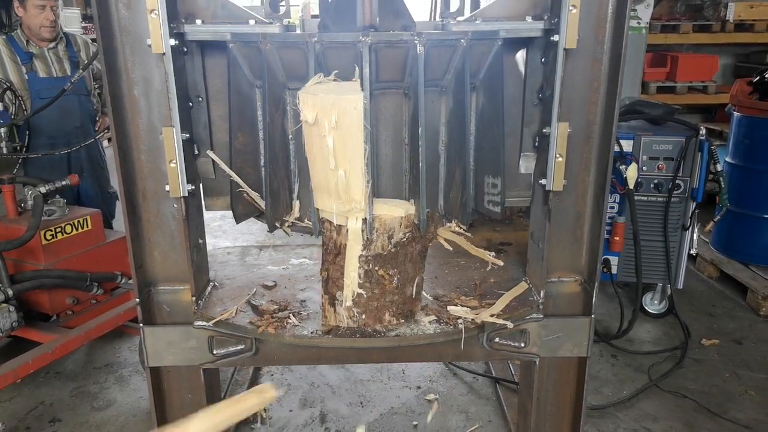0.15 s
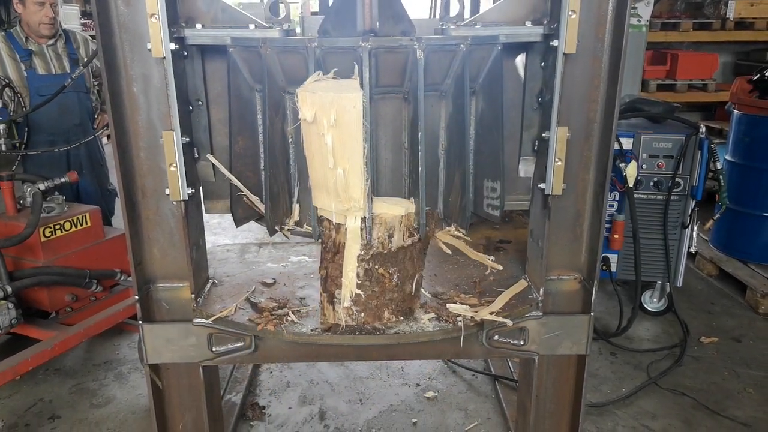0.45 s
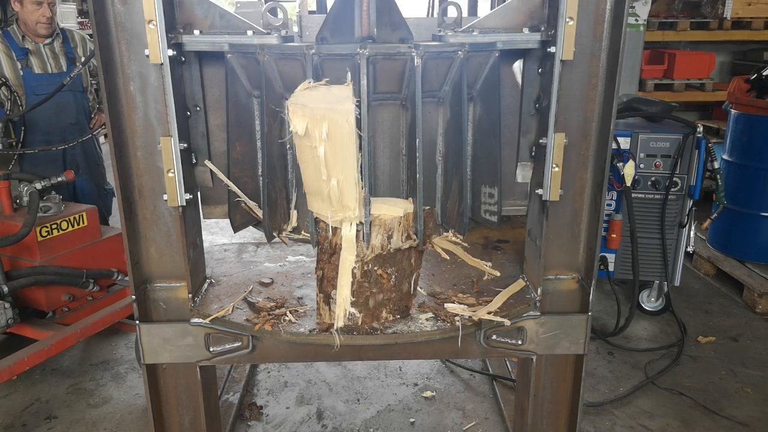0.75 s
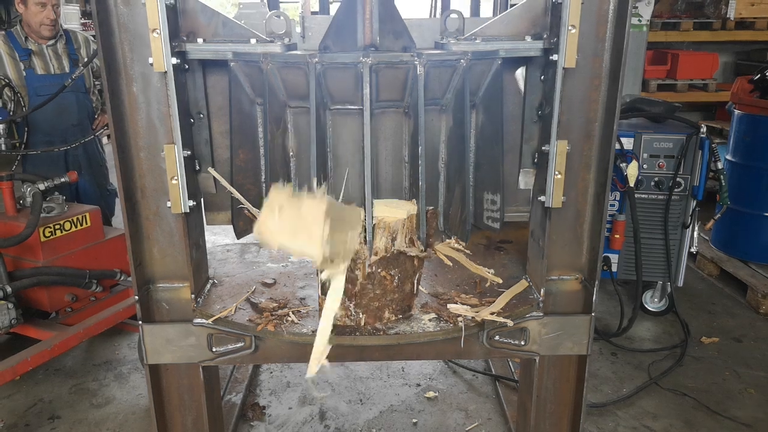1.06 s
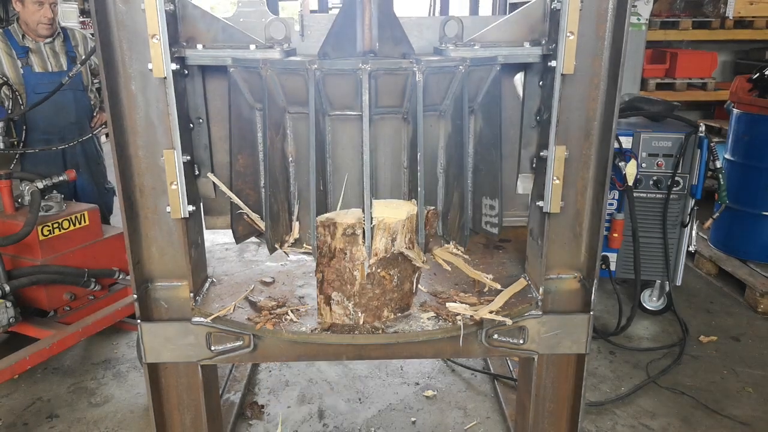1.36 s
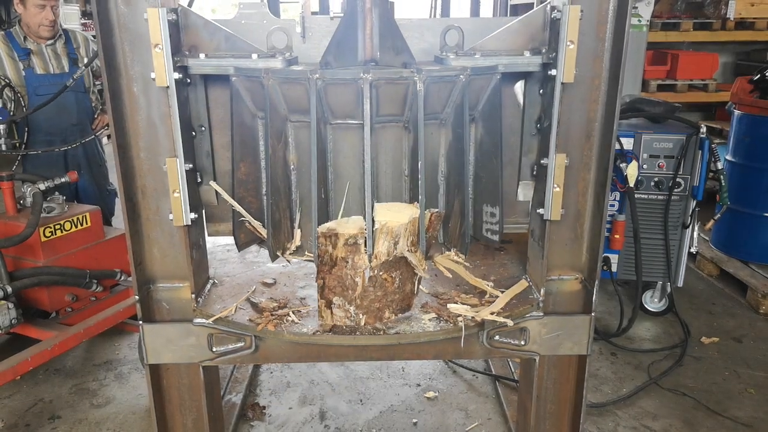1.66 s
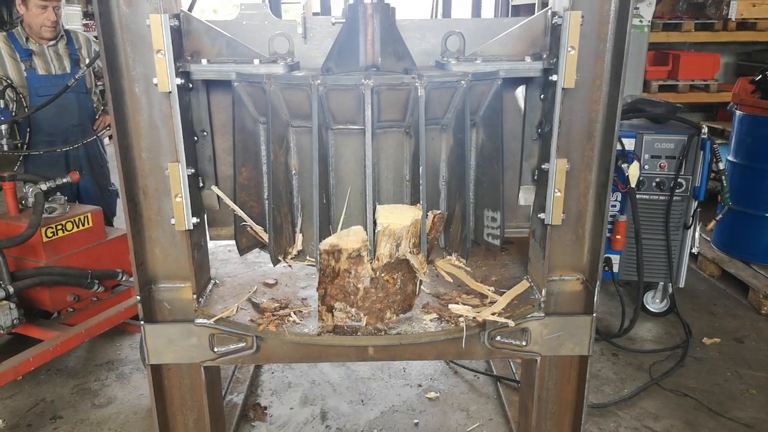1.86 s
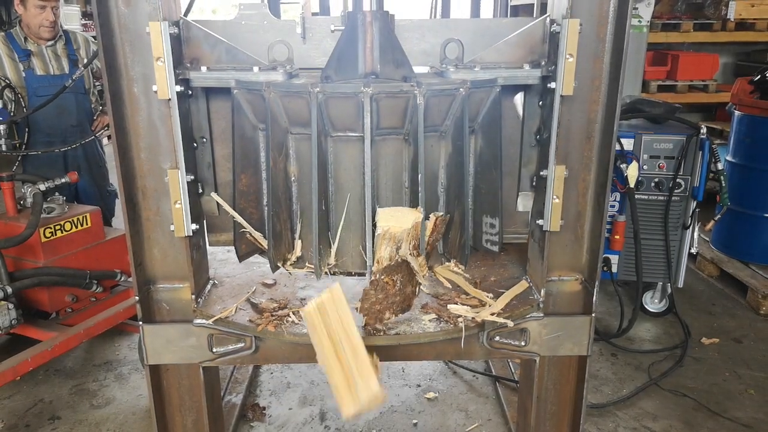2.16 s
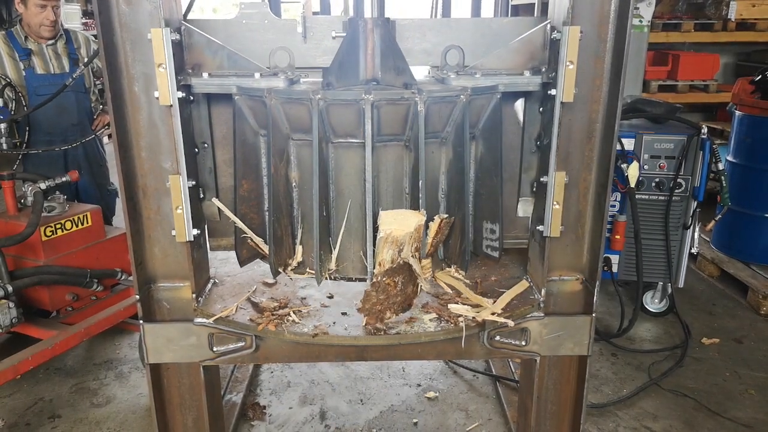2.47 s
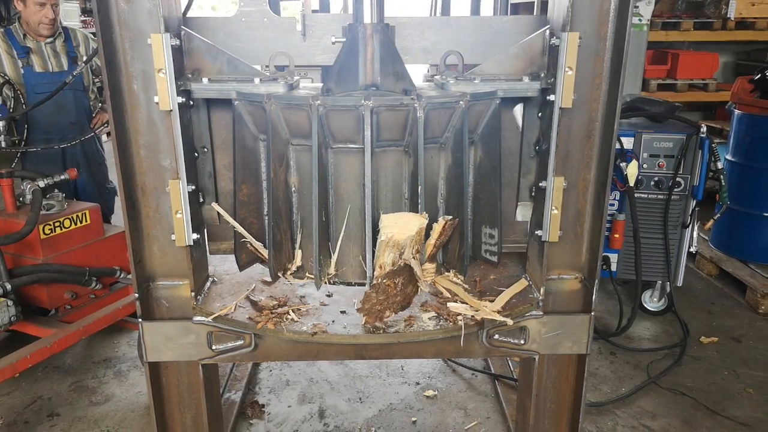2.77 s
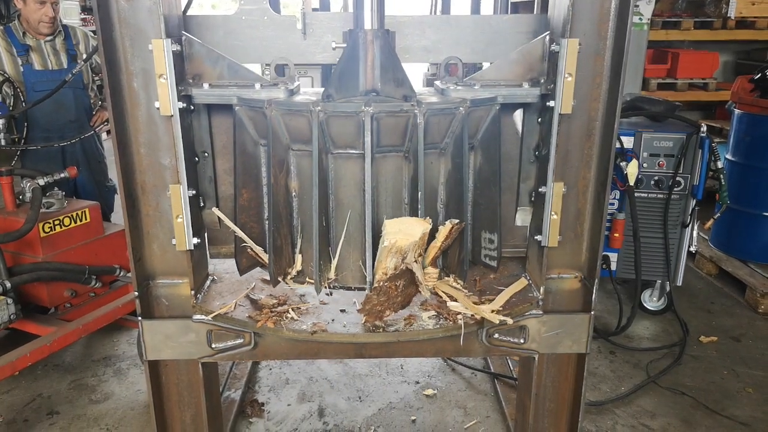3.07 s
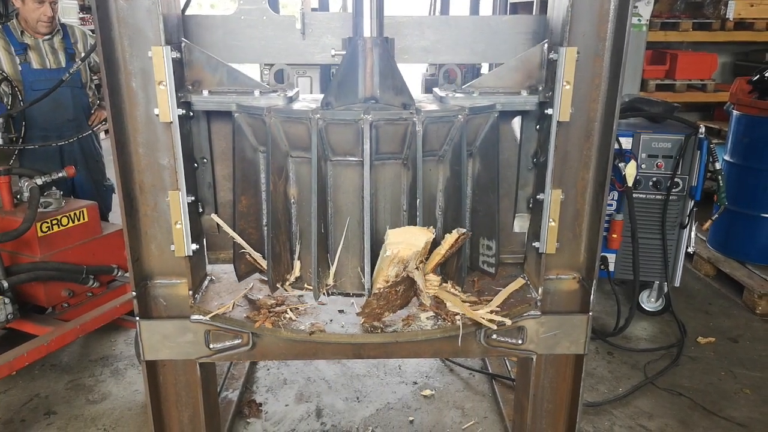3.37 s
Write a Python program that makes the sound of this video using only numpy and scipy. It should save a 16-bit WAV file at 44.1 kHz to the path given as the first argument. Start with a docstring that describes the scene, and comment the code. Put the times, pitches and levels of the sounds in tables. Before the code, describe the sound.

Hydraulic log splitter pressing a log apart, pump whining, fibres tearing, split pieces knocking and dropping

```python
"""A piston pump whines over a motor hum, and at once the frame bumps and fibres crack: a hydraulic
log splitter presses a log through its steel knives, heard in stereo with the workshop around it.
The power unit is summed tones and filtered noise. Wood clacks on the knives, a billet clangs on the
steel frame and split pieces drop to the floor: each blow is a short noise burst, filtered or with
decaying resonances. A diffuse noise tail gives the room."""
import sys
import numpy as np
from scipy import signal
from scipy.fft import rfft, irfft
from scipy.io import wavfile

SR = 44100
rng = np.random.default_rng(int(sys.argv[2]) if len(sys.argv) > 2 else 0)


def dump(signal):
    """Clip the signal to [-1, 1] and save it as 16-bit WAV at the path in sys.argv[1]."""
    limited = np.clip(np.atleast_2d(signal).T, -1, 1)
    pcm = np.round(limited * 32767).astype(np.int16)
    wavfile.write(sys.argv[1], SR, pcm)


N = 156114
T = np.arange(N) / SR

# In every table, left-right dB is the left side's level over the right's.
# How alike the two sides are. Each row: frequency in Hz, likeness from 0 to 1.
LIKENESS = [(50, 1), (130, 0.97), (260, 0.96), (500, 0), (1000, 0.95), (2000, 0), (12000, 0)]
PAN_ABOVE_HZ = 240

# Workshop decay. Each row: frequency in Hz, time to fall 60 dB in seconds.
ROOM_T60 = [(80, 0.84), (250, 1), (700, 1), (2000, 0.98), (4500, 0.21), (12000, 0.17)]
ROOM_BUILD_S = .006
# Room sends against the direct sound.
CLACK_WET_DB, CRACK_WET_DB, DROP_WET_DB, BUMP_WET_DB, CLANG_WET_DB = -4.5, -4, -4, -0.5, 5.5

# Pump harmonics. Each row: multiple of the piston rate, level in dB, left-right in dB.
PUMP_HARMONICS = [(1, -40.5, -0.5), (2, -62, -27), (3, -49, 25), (4, -38.5, -12), (5, -50, -13),
                  (6, -43.5, -3), (7, -67, 32), (8, -44.5, -1.5), (9, -34, -3.5), (10, -40, -58),
                  (11, -49.5, -7.5)]
PUMP_HZ, PISTONS, PUMP_WANDER = 271.05, 9, .0003  # piston rate; wander as a share of it
PUMP_FLUTTER_DB, PUMP_SPREAD_RAD = 0.8, 1.0
PULSE_SCATTER_RAD = 1.08  # how far the harmonics stray from one sharp piston pulse
WHINE_DB, WHINE_DB_PER_OCT, WHINE_SCATTER_DB = -58.5, -5, 3  # harmonics above the table
# Motor and other steady tones. Each row: frequency in Hz, level in dB, left-right in dB.
HUM_TONES = [(49.7, -38.5, 0), (790, -51, -6), (2538, -49.5, -8), (8402, -63, 12)]
# Colour of the shaft orders. Each row: frequency in Hz, relative level in dB.
SHAFT_COLOUR = [(100, -57), (300, -11), (600, 1), (900, -7), (2000, 2), (2600, 10), (3200, 17), (7000, -14),
                (14000, -15)]
SHAFT_DB = -21  # against the flow noise
# Colour of oil flow, fan and casing before the rumble cut. Each row: frequency in Hz, relative dB per Hz.
FLOW_COLOUR = [(25, 19), (45, 9.5), (80, 3.5), (135, 1.5), (200, -4.5), (300, -3.5), (480, -17), (680, -18),
               (900, -10), (1300, -13), (2000, -7.5), (2650, -3.5), (3150, -16), (5500, -17.5), (7300, -19),
               (8700, -25.5), (10300, -24), (12000, -30.5), (15000, -40)]
FLOW_DB, FLOW_PAN_DB, RUMBLE_CUT_HZ = -36.5, -1, 70
# Thin hiss of the valve. Each row: time in seconds, level in dB.
VALVE_LEVEL = [(0, -57), (.28, -47.5), (.4, -102), (2.4, -66), (2.8, -59), (3.54, -53.5)]
VALVE_HZ, VALVE_WIDTH_HZ = 10060, 580

# Floor and frame rumble. Each row: start in seconds, starting level in dB.
RUMBLES = [(0, -35), (1.445, -27.5), (2.475, -32.5)]
# Colour of that rumble. Each row: frequency in Hz, relative level in dB.
RUMBLE_COLOUR = [(30, -20.5), (90, 5.5), (170, -4.5), (300, -7), (600, -12), (2000, -40.5)]
RUMBLE_T60_S = 1.5

# Modes of the steel frame. Each row: frequency in Hz, level in dB before the trim, 60 dB decay in seconds.
FRAME_MODES = [(339, -29, 1), (700, -37, 1), (754, -38, 1.2), (940, -36, 1.1), (1233, -28, 1.5),
               (1396, -30, 1.3), (1470, -28.5, 1.2), (1678, -31, 1.3), (1805, -32, .9), (1880, -32, 1.1),
               (1965, -28.5, 1.2), (2068, -29, 1.2), (2250, -36, 1.1), (2363, -31, .5)]
FRAME_TRIM_DB, FRAME_PAN_DB = -0.5, -5

HIT_S = .01  # a blow of 0 dB has the energy of a sound of rms 1 this long
CONTACT_RISE_S = 0.00011
RING_RISE_S, RING_SPREAD_RAD = .0012, 0.51  # the spread is reached at 1 kHz, less below

# The frame bumps as the log gives. Each row: start in seconds, level in dB, pitch in Hz.
BUMPS = [(.004, -23, 101), (0.038, -27.5, 124), (0.08, -20.5, 86), (0.114, -32, 110), (0.151, -22, 107),
         (0.18, -22.5, 83), (0.305, -35, 65), (1.444, -17, 68.4), (1.523, -28, 107)]
# Colour of a bump's rumble. Each row: frequency in Hz, relative level in dB.
BUMP_COLOUR = [(25, 4), (55, -5.5), (85, 0), (160, 3), (240, -9), (400, -13), (900, -9.5), (3000, -75),
               (12000, -76)]
BUMP_S, BUMP_RUMBLE_DB = 0.0077, -3.5  # decay constant; rumble against the swing

# Pieces land. Each row: start in seconds, level in dB, left-right in dB, contact decay in seconds,
# thud in dB against the contact, thud in Hz, ring in dB against the contact, ring in Hz.
DROPS = [(0.402, -13.5, -9, 0.0023, 4.5, 423, 5.5, 2077), (1.4404, -15.5, -5, 0.0022, 1.5, 460, 0.5, 1313),
         (1.4444, -17, -8, 0.0037, 0.5, 440, -1, 1373), (2.4756, -19, -6.5, 0.0095, -1.5, 302, -6, 1390)]
# Colour of the landing contact. Each row: frequency in Hz, relative level in dB.
DROP_COLOUR = [(30, -1), (80, 8), (200, 2.5), (350, 5.5), (550, 3.5), (720, -4), (950, 5), (1350, -1),
               (1700, 9), (2300, 4.5), (3100, -15.5), (5500, -10), (9000, -26), (12000, -16.5),
               (15000, -44)]
THUD_SHARE, KNOCK_RING_S = 0.53, 0.003  # thud decay against the contact's; decay of the upper ring

# Wood strikes the frame. Each row: start in seconds, level in dB, left-right in dB, decay in seconds.
CLANGS = [(0.3287, -14, -3, 0.0095), (0.3392, -23.5, -2, 0.0033), (0.344, -23.5, 7, 0.0063)]
# Colour of a clang. Each row: frequency in Hz, relative level in dB.
CLANG_COLOUR = [(60, -25), (220, 0.5), (330, -3), (500, -9), (750, 7.5), (1050, -0.5), (1420, 10.5),
                (1700, -1), (2050, 8.5), (2650, 3.5), (3200, -11), (5500, -18), (12000, -28)]

# Fine crackle of tearing fibres. Each row: time in seconds, level in dB.
TEARING_LEVEL = [(0, -32), (.28, -28.5), (.42, -22), (.75, -28), (.9, -36.5), (1.5, -48), (1.72, -40),
                 (1.95, -43.5), (2.15, -47), (2.4, -47), (3.54, -56)]
# Colour of the crackle. Each row: frequency in Hz, relative level in dB.
FIBRE_COLOUR = [(100, -17.5), (350, 5), (550, 0), (900, 0.5), (1500, 6), (2400, 2), (3200, -8),
                (5500, -15.5), (8000, -24.5), (15000, -47)]
FIBRE_S, FIBRES_PER_S = 0.0026, 290  # decay of one snap; rate before clumping
FIBRE_SPREAD_DB, FIBRE_CLUMP_DB, CLUMP_HZ = 2.5, 3, 14

# Larger fibres snap. Each row: start in seconds, level in dB, left-right in dB, decay in seconds.
CRACKS = [(0.032, -23.5, -2, 0.014), (0.342, -29, -1, 0.0044), (0.475, -30, -2, 0.0039),
          (.56, -28.5, 0, 0.012), (1.4364, -28, -21, 0.0027), (1.5176, -19, -3.5, 0.0026),
          (1.703, -31, -10, 0.0085), (1.827, -27, 2, 0.0048), (2.105, -32.5, 3, 0.0027),
          (2.13, -34, -7, 0.0074), (2.26, -33.5, -5, 0.005)]
# Colour of a snap. Each row: frequency in Hz, relative level in dB.
CRACK_COLOUR = [(100, -11), (600, -3), (1300, -2), (2200, 14), (3000, 1), (3900, 3), (5500, -3), (7500, -8),
                (11000, -14), (15000, -19)]

# Wood clacks on knives and table. Each row: start in seconds, level of the ring in dB,
# bright edge in dB against the ring, left-right in dB, ring decay in seconds, pitch in Hz.
CLACKS = [(0.1157, -21, -31, -4.5, 0.0029, 1814), (0.1184, -26.5, -22, -5, 0.0045, 1160),
          (0.166, -22.5, -28, -8, 0.005, 1643), (0.188, -34, -12, 2, 0.0018, 1640),
          (0.228, -34, -24, -6, 0.0028, 1540), (0.3056, -23.5, -10.5, -14, 0.0014, 1700),
          (0.645, -21, -13.5, -3, 0.0028, 1890), (0.6477, -22, -32, -13, 0.0049, 1615),
          (0.694, -19.5, -25, -0.5, 0.0058, 1900), (0.7255, -20, -8, -17, 0.0072, 1750),
          (0.731, -17, -2, -3.5, 0.0028, 1930), (0.767, -32, -22, -11, 0.002, 1700),
          (0.7864, -17, -1, -2, 0.0032, 1930), (1.06, -30.5, -20, -17, 0.0037, 2020),
          (1.8257, -29.5, -17, -11, 0.0012, 1820), (1.829, -34, -24, -10, 0.0046, 1330),
          (2.133, -33, -13, -6, 0.0056, 1630)]
# Colour of the bright edge. Each row: frequency in Hz, relative level in dB.
CLACK_EDGE_COLOUR = [(100, 2.5), (500, -9), (780, 9.5), (1100, 3), (1600, -10), (2600, -22), (3600, 2.5),
                     (5200, 4), (7600, 2), (9000, -12), (15000, -62)]
CLACK_WIDTH_HZ, CLACK_RASP_DB = 600, -2  # rough share of the ring
EDGE_SHARE = 0.44  # decay of the edge against that of the ring

TOP_STOP_HZ = 16200


def from_db(db):
    """Decibels to gain."""
    return 10 ** (np.asarray(db) / 20)


def rms_one(x):
    """Scale to rms 1."""
    return x / np.sqrt(np.mean(x ** 2) + 1e-20)


def unit_hit(x):
    """Scale a blow to the energy of a short stereo sound of rms 1."""
    return x / np.sqrt(np.sum(x ** 2) / (2 * HIT_S * SR))


def at_hz(points, hz):
    """Read a table over log frequency."""
    f, v = np.transpose(points)
    return np.interp(np.log(np.maximum(hz, 1)), np.log(f), v)


def level_over_time(points):
    """Gain along the scene from a table of times and decibels."""
    return from_db(np.interp(T, *np.transpose(points)))


def scatter(size=None):
    """Even chance between minus one and one."""
    return rng.uniform(-1, 1, size)


def opposite_sides():
    """Plus one on one side and minus one on the other, by chance."""
    return rng.choice([-1, 1]) * np.array([[1], [-1]])


def drift(rate_hz):
    """Slow chance with spread 1: noise through two equal poles, drawn every 40 samples."""
    r = np.exp(-80 * np.pi * rate_hz / SR)
    noise = rng.standard_normal(N // 40 + 2002)
    slow = signal.lfilter([1], [1, -2 * r, r * r], noise)[2000:]  # drop the settling
    return np.interp(np.arange(N) / 40, np.arange(len(slow)), rms_one(slow))


def panned(db):
    """Left and right gains of constant power."""
    return rms_one(from_db(np.array([[db], [-db]]) / 2))


def placed(x, pan_db):
    """Pan everything but the bass."""
    bass = signal.sosfiltfilt(signal.butter(1, PAN_ABOVE_HZ, fs=SR, output="sos"), x)
    return bass + panned(pan_db) * (x - bass)


def coloured(x, spectrum):
    """Causal (minimum-phase) filter with the given spectrum."""
    n = x.shape[-1]
    gain = from_db(at_hz(spectrum, np.fft.rfftfreq(n, 1 / SR)))
    cepstrum = irfft(np.log(gain), n)
    # Folding the cepstrum forward gives minimum phase.
    cepstrum[1:n // 2] *= 2
    cepstrum[n // 2 + 1:] = 0
    return irfft(rfft(x) * np.exp(rfft(cepstrum)), n)


def resonance(x, hz, width_hz):
    """One two-pole resonance."""
    r = np.exp(-np.pi * width_hz / SR)
    return signal.lfilter([1, 0, -1], [1, -2 * r * np.cos(2 * np.pi * hz / SR), r * r], x + 1e-18)


def diffuse(n):
    """White stereo noise whose sides are alike by frequency as the table says."""
    mid, side = rfft(rng.standard_normal((2, n)))
    alike = np.clip(at_hz(LIKENESS, np.fft.rfftfreq(n, 1 / SR)), -1, 1)
    both = np.sqrt(1 + alike) * mid + np.sqrt(1 - alike) * side * [[1], [-1]]
    return irfft(both, n) / np.sqrt(2)


def swell_and_die(t, rise_s, decay_s):
    """Envelope of a blow: a quick rise and an exponential decay."""
    return np.exp(-t / max(decay_s, 1 / SR)) * (1 - np.exp(-t / rise_s))


def contact(decay_s, size=8192):
    """A rough contact: a sudden noise burst that dies within milliseconds."""
    return diffuse(size) * swell_and_die(T[:size], CONTACT_RISE_S, decay_s)


def ring(hz, decay_s, size=8192):
    """A resonance swells and dies; high ones reach the two sides further out of step."""
    t = T[:size]
    offset = RING_SPREAD_RAD * min(hz / 1000, 1) * opposite_sides()
    return unit_hit(swell_and_die(t, RING_RISE_S, decay_s) * np.sin(2 * np.pi * hz * t + offset))


def add(out, s, x):
    """Mix a sound in at a time in seconds."""
    i = max(int(s * SR), 0)
    out[:, i:i + x.shape[1]] += x[:, :N - i]


def workshop(x):
    """The room: a diffuse noise tail in nine bands that dies sooner in the treble."""
    t, f = T[:SR], np.fft.rfftfreq(SR, 1 / SR)
    noise = rfft(diffuse(SR))
    centres, tail = np.geomspace(60, 15000, 9), 0
    for hz, share in zip(centres, np.eye(len(centres))):
        band = irfft(noise * at_hz(list(zip(centres, share)), f), SR)
        tail = tail + band * from_db(-60 * t / at_hz(ROOM_T60, hz))
    tail = tail * (1 - np.exp(-t / ROOM_BUILD_S))
    # Scale by the energy of the mid-range decay.
    tail /= np.sqrt(np.sum(from_db(-60 * t / ROOM_T60[2][1]) ** 2))
    return signal.fftconvolve(x, tail, axes=1)[:, :N]


def pump_tone(phase, db, pan_db, spread):
    """A pump harmonic that flutters and reaches the two sides out of step."""
    offset = spread / 2 * opposite_sides()
    gain = from_db(db + PUMP_FLUTTER_DB * drift(1.13)) * panned(pan_db)
    return gain * np.cos(phase + PULSE_SCATTER_RAD * scatter() + offset)


def pump_whine(phase):
    """Piston strokes make harmonics of one wandering rate, falling away up to the 32nd."""
    out = np.zeros((2, N))
    for k, (_, db, pan) in enumerate(PUMP_HARMONICS, 1):
        out += pump_tone(k * phase, db, pan, PUMP_SPREAD_RAD * min(k / 2, 1))
    top = len(PUMP_HARMONICS)
    for k in range(top + 1, 33):
        db = WHINE_DB + WHINE_DB_PER_OCT * np.log2(k / top) + WHINE_SCATTER_DB * scatter()
        out += pump_tone(k * phase, db, FLOW_PAN_DB, PUMP_SPREAD_RAD)
    return out


def motor_hum():
    """Steady sines of the motor and other tones."""
    out = np.zeros((2, N))
    for hz, db, pan in HUM_TONES:
        out += from_db(db) * placed(np.sin(2 * np.pi * hz * T + rng.uniform(0, 2 * np.pi)), pan)
    return out


def shaft_orders(phase):
    """One turn of coloured noise, repeated with the shaft, sounds between the piston harmonics."""
    turn = rms_one(coloured(diffuse(round(SR * PISTONS / PUMP_HZ)), SHAFT_COLOUR))
    angle = phase / (2 * np.pi * PISTONS) % 1
    return np.array([np.interp(angle, np.linspace(0, 1, len(side)), side) for side in turn])


def oil_flow():
    """Oil flow, fan and casing: coloured noise with its rumble cut."""
    rumble_cut = signal.butter(2, RUMBLE_CUT_HZ, "high", fs=SR, output="sos")
    return rms_one(signal.sosfilt(rumble_cut, coloured(diffuse(N), FLOW_COLOUR)))


def valve_hiss():
    """Noise through one high resonance, its level following the table."""
    return level_over_time(VALVE_LEVEL) * rms_one(resonance(diffuse(N), VALVE_HZ, VALVE_WIDTH_HZ))


def power_unit():
    """Pump and shaft turn on one phase, with motor hum, oil flow and valve hiss."""
    phase = 2 * np.pi * np.cumsum(PUMP_HZ * (1 + PUMP_WANDER * drift(1.6))) / SR
    tones = np.sqrt(2) * (pump_whine(phase) + motor_hum())  # table levels are rms
    flow = oil_flow() + from_db(SHAFT_DB) * shaft_orders(phase)
    return tones + from_db(FLOW_DB) * placed(flow, FLOW_PAN_DB) + valve_hiss()


def rumbles():
    """Floor and frame rumble on in low noise that fades from each start."""
    out, t = np.zeros((2, N)), T[:SR]
    for s, db in RUMBLES:
        fade = from_db(db - 60 * t / RUMBLE_T60_S)
        add(out, s, fade * rms_one(coloured(diffuse(SR), RUMBLE_COLOUR)))
    return out


def frame_ring():
    """The steel frame's modes ring on as decaying sines from the first clang."""
    out, t = np.zeros((2, N)), T[:2 * SR]
    for hz, db, t60 in FRAME_MODES:
        phase = rng.uniform(0, 2 * np.pi) + scatter(size=(2, 1))
        fade = from_db(FRAME_TRIM_DB + db - 60 * t / t60)
        add(out, CLANGS[0][0], fade * np.sin(2 * np.pi * hz * t + phase))
    return panned(FRAME_PAN_DB) * out


def bumps():
    """Low jolts of the machine: a swing or two under a short rumble."""
    out = np.zeros((2, N))
    for s, db, hz in BUMPS:
        rumble = unit_hit(coloured(contact(BUMP_S), BUMP_COLOUR))
        add(out, s, from_db(db) * unit_hit(ring(hz, BUMP_S) + from_db(BUMP_RUMBLE_DB) * rumble))
    return out


def drops():
    """Pieces land with a rough contact, a hollow thud and a short woody ring."""
    out = np.zeros((2, N))
    for s, db, pan, decay, thud_db, thud_hz, ring_db, ring_hz in DROPS:
        rough = unit_hit(coloured(contact(decay), DROP_COLOUR))
        thud = from_db(thud_db) * ring(thud_hz, THUD_SHARE * decay)
        knock = from_db(ring_db) * ring(ring_hz, KNOCK_RING_S)
        add(out, s, from_db(db) * placed(unit_hit(rough + thud + knock), pan))
    return out


def coloured_blows(rows, colour):
    """Blows that are each one coloured burst of contact noise."""
    out = np.zeros((2, N))
    for s, db, pan, decay in rows:
        add(out, s, from_db(db) * panned(pan) * unit_hit(coloured(contact(decay), colour)))
    return out


def clangs():
    """A quick run of blows of wood on the steel."""
    return coloured_blows(CLANGS, CLANG_COLOUR)


def crackle():
    """Single fibres give way in uneven clumps, each with a short rasp."""
    size_db = FIBRE_SPREAD_DB * np.minimum(rng.exponential(1, N), 3)
    sizes = from_db(size_db) * rng.choice([-1, 1], (2, N))
    born = rng.random(N) < FIBRES_PER_S * from_db(FIBRE_CLUMP_DB * drift(CLUMP_HZ)) / SR
    snaps = signal.fftconvolve(sizes * born, contact(FIBRE_S), axes=1)[:, :N]
    return level_over_time(TEARING_LEVEL) * rms_one(coloured(snaps, FIBRE_COLOUR))


def cracks():
    """Short bright snaps of tearing fibres."""
    return coloured_blows(CRACKS, CRACK_COLOUR)


def clacks():
    """Each knock rings a resonance of the wood, set by where it is struck, under a bright edge."""
    out = np.zeros((2, N))
    for s, db, edge_db, pan, decay, hz in CLACKS:
        rasp = unit_hit(resonance(contact(decay), hz, CLACK_WIDTH_HZ))
        edge = unit_hit(coloured(contact(EDGE_SHARE * decay), CLACK_EDGE_COLOUR))
        wood = unit_hit(ring(hz, decay) + from_db(CLACK_RASP_DB) * rasp)
        add(out, s, from_db(db) * panned(pan) * (wood + from_db(edge_db) * edge))
    return out


def scene():
    """The power unit and all the blows, with the room around the blows."""
    blows = [(bumps(), BUMP_WET_DB), (drops(), DROP_WET_DB), (clangs(), CLANG_WET_DB),
             (cracks() + crackle(), CRACK_WET_DB), (clacks(), CLACK_WET_DB)]
    direct = sum(x for x, _ in blows)
    room = workshop(sum(from_db(wet_db) * x for x, wet_db in blows))
    return power_unit() + rumbles() + frame_ring() + direct + room


def record(dry):
    """Peaks stop at full scale, then the top is cut by 70 dB."""
    top_cut = signal.cheby2(14, 70, TOP_STOP_HZ, fs=SR, output="sos")
    return signal.sosfilt(top_cut, np.clip(dry, -1, 1))


dry = scene()
out = record(dry)
dump(out)
```